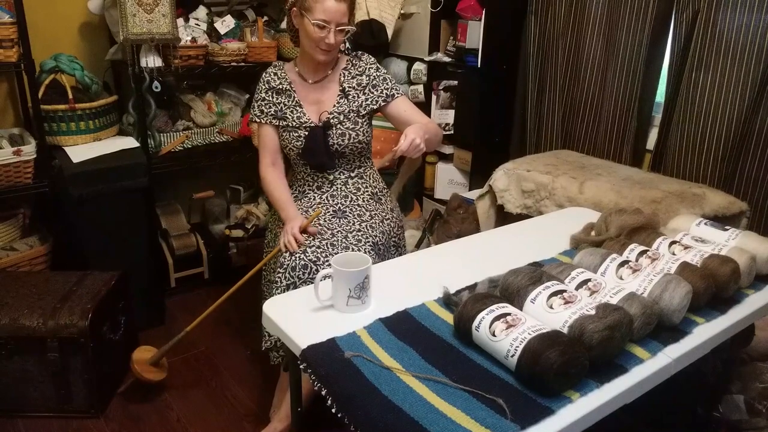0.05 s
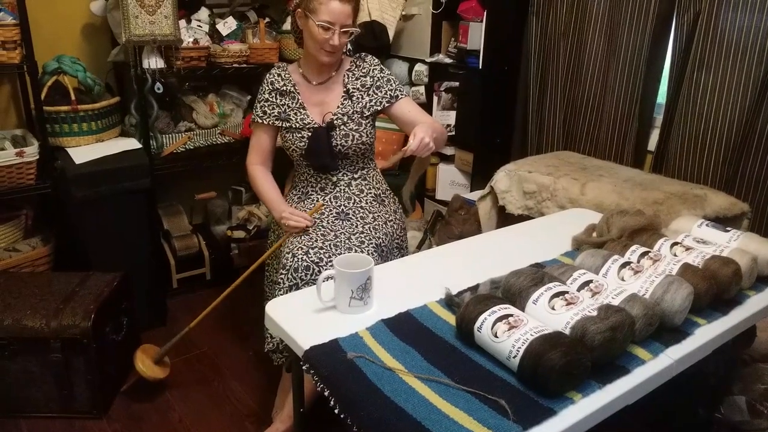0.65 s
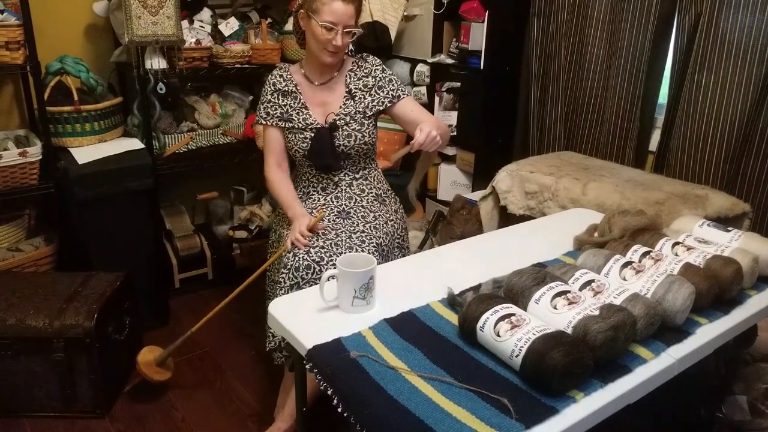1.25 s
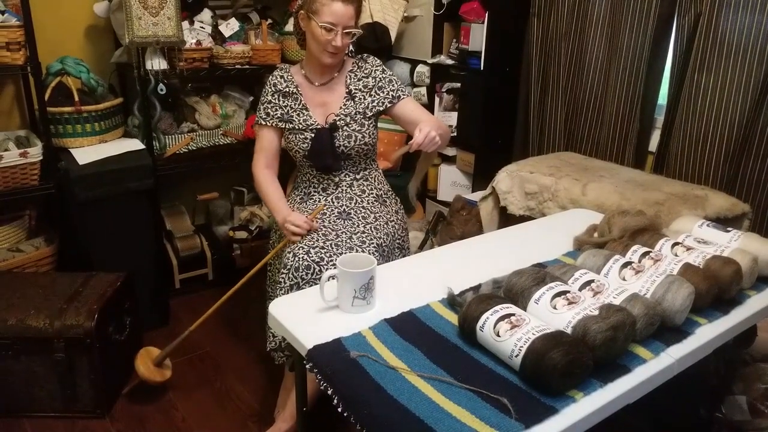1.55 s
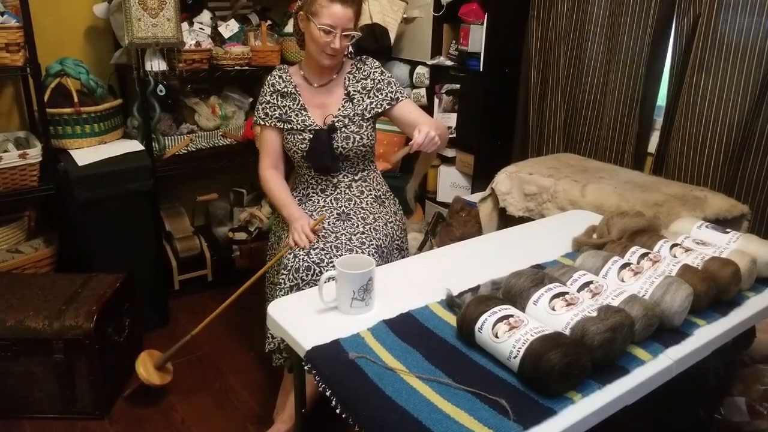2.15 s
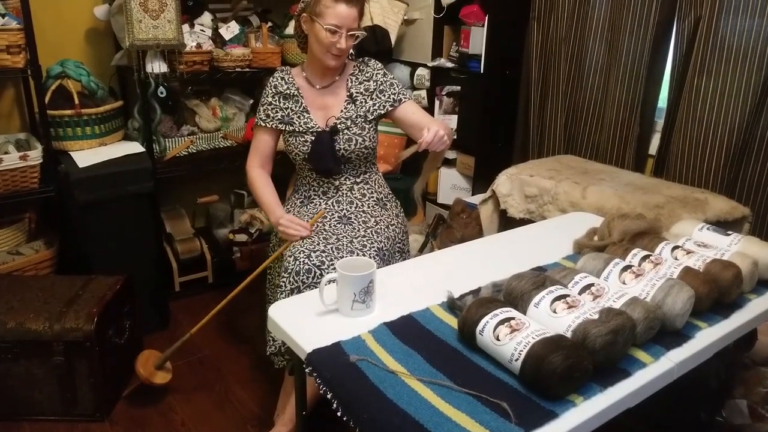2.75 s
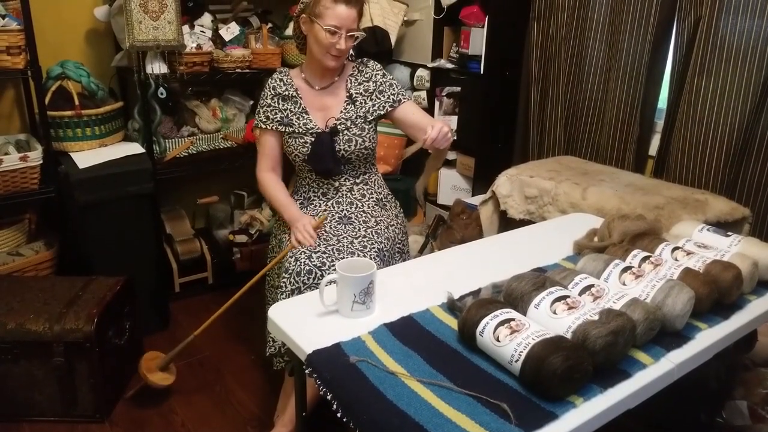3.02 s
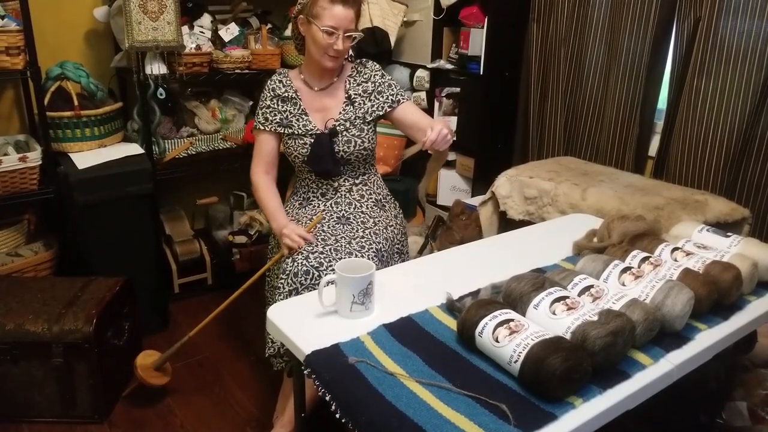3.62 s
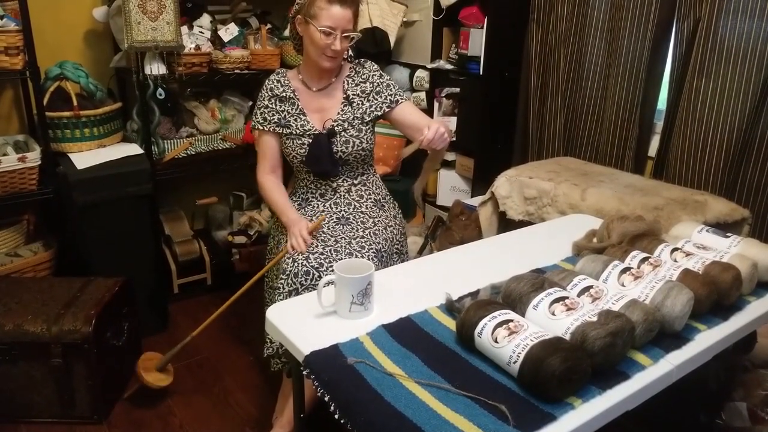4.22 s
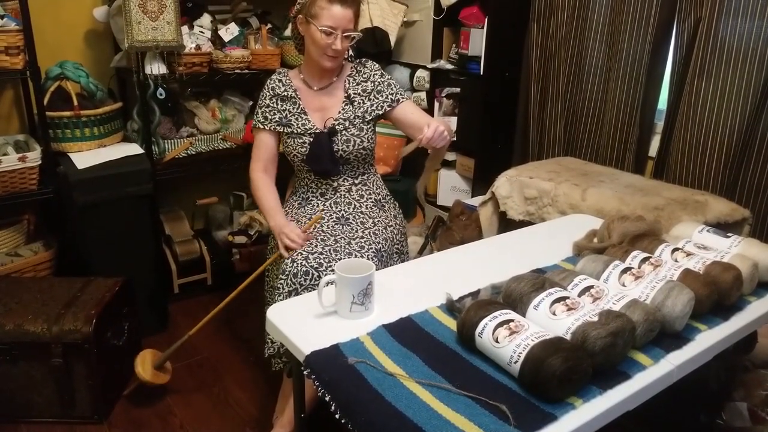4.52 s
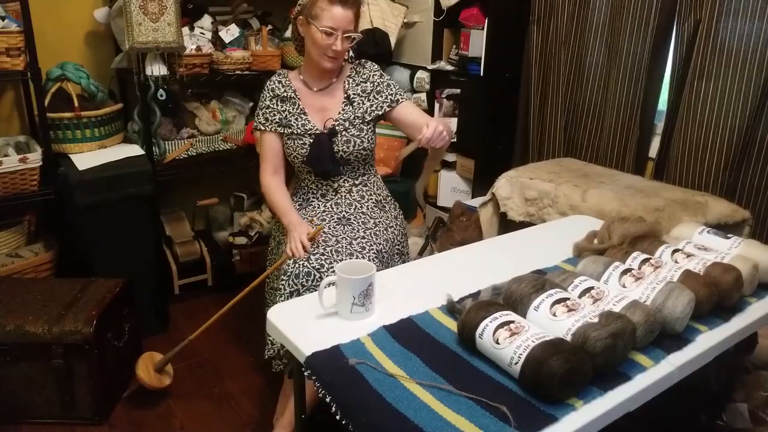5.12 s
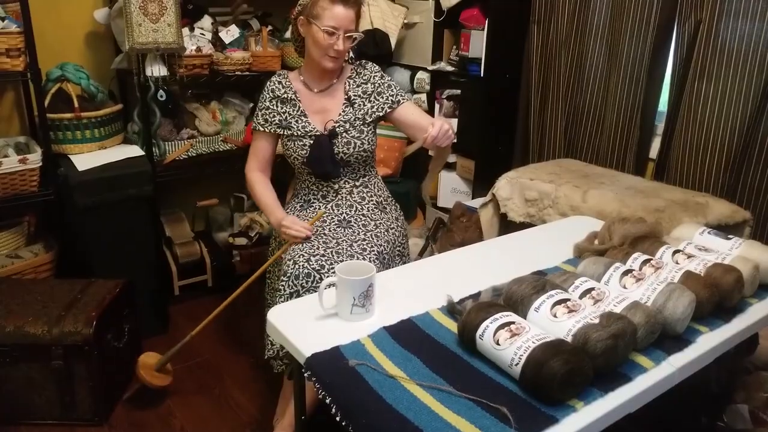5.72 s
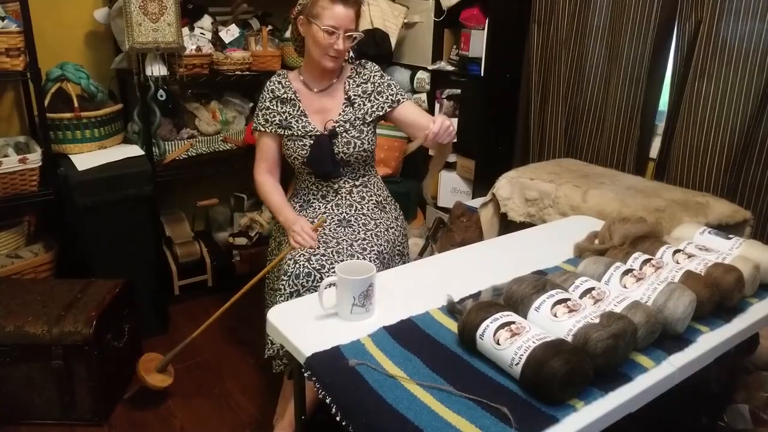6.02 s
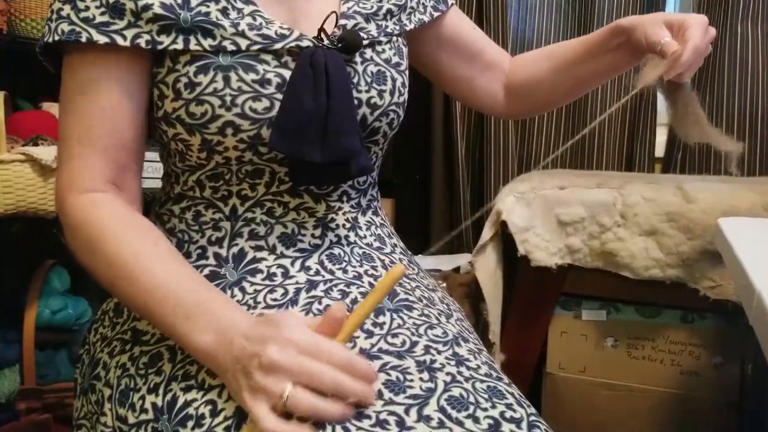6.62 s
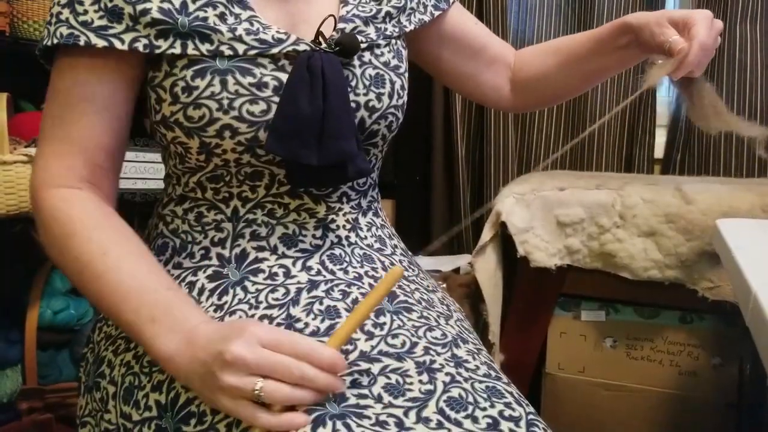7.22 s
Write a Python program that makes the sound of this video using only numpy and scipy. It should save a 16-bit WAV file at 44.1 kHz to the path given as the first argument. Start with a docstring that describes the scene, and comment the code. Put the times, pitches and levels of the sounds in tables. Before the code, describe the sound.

A wooden spindle is rolled on a lap in a small, quiet room, its tip resting on a hardwood floor. A finger ring strikes the shaft with light, sharp ticks close to the microphone, roughly every 0.4 seconds through the first three seconds, strongest near 0.2, 0.5, 1.8 and 2.6 seconds. Further ticks come less regularly, the clearest around 3.9, 4.3, 5.6 and 6.4 seconds. Between them the tip rolls faintly, hops and lands with small wooden knocks, each with a quick bounce and a short room echo. These knocks stand out at about 0.3, 0.7 and 1.9 seconds, then come more often from 2.8 seconds on, with firmer ones near 4.8, 6.2, 6.6 and 7.1 seconds. Very soft, dull bumps of hand on cloth are scattered underneath. A faint, steady hiss and low room rumble continue throughout.

```python
"""A spindle rolled on a wooden floor

A long wooden spindle is rolled on a lap, its tip resting on hardwood boards in a small, quiet room.
At each stroke a finger ring strikes the shaft and excites its short-lived modes; the tip then rolls,
hops and knocks, driving the boards by impact, while hand and cloth make dull bumps. A clip-on
microphone hears the ticks close by and the knocks through the room, over its own hiss."""
import sys
import numpy as np
from scipy import signal
from scipy.fft import rfft, irfft
from scipy.io import wavfile
from scipy.ndimage import uniform_filter1d

SR = 44100
rng = np.random.default_rng(int(sys.argv[2]) if len(sys.argv) > 2 else 0)


def master(y):
    """Save y as 16-bit WAV."""
    cut = np.clip(np.atleast_2d(y).T, -1, 1)
    pcm = np.round(cut * 32767)  # scale
    wavfile.write(sys.argv[1], SR, pcm.astype(np.int16))


N = 320166
T = np.arange(N) / SR

# Spectrum of room rumble and microphone hiss. Each row: frequency in Hz, relative level in dB.
BACKGROUND_SPECTRUM = [(22, -15), (40, -14), (70, 5), (110, 0.5), (200, -1), (330, 0), (600, -4.5),
                       (1200, -3), (2500, -9.5), (4300, -10.5), (5200, -4), (6800, -5.5)]
# Impacts of the finger ring on the shaft.
# Each row: start in seconds, level in dB, nominal pitch of the lowest mode in Hz, brightness in dB.
RING_TICKS = [(0.1621, -24.5, 1925, 7.5), (0.5359, -25, 1944, 9.5), (0.8859, -43, 1970, 7),
              (1.356, -30.5, 1950, 11.5), (1.7723, -25.5, 1940, 11), (2.1591, -32, 1970, 10.5),
              (2.6144, -26, 2020, 1), (3.04, -32.5, 2050, 1.5), (3.8618, -28, 1960, 4),
              (4.276, -30.5, 1936, -1), (4.7436, -33.5, 2400, -16), (5.6104, -28, 1866, 6),
              (6.0278, -33.5, 2310, -1), (6.4352, -30.5, 1950, 8.5), (6.9383, -33, 2020, -3)]
# Further modes of the shaft. Each row: frequency in Hz, relative level in dB, free T60 in seconds.
SHAFT_MODES = [(1150, -26, 0.025), (2863, -8.5, 0.007), (4200, -19.5, 0.0088), (4746, -17, 0.012),
               (5750, -19.5, 0.0085), (6100, -38, .008)]
# Room resonances excited by a tick. Each row: frequency in Hz, relative level in dB.
ROOM_MODES = [(1618, 7), (1840, -4), (1949, -5), (2326, 0), (2740, 1), (2895, -2), (4310, 1), (4675, 1)]
# Spells of rolling without a hop. Each row: centre in seconds, half-width in seconds, level in dB.
TIP_ROLLS = [(0.298, 0.029, -56.5), (1.017, 0.072, -61), (1.512, 0.12, -57), (1.87, 0.083, -61),
             (2.272, 0.13, -63), (3.064, 0.057, -60.5), (4.237, 0.043, -62.5), (4.67, 0.081, -60.5),
             (5.982, 0.037, -62), (6.26, 0.045, -60), (6.928, 0.064, -59.5), (7.074, 0.037, -52)]
# Landings of the tip, each with one bounce. Each row: start in seconds, level in dB, resonance of the
# spot in Hz, brightness in dB, bounce delay in seconds, its relative level in dB, its resonance in Hz.
TIP_KNOCKS = [(0.317, -28.5, 1030, -18, 0.019, -1.5, 990), (0.661, -31.5, 1170, -14.5, 0.013, -3.5, 1220),
              (1.585, -41, 845, -32, 0.0091, -8.5, 860), (1.945, -31, 990, -21, .021, 1, 1090),
              (2.808, -36, 1120, -20.5, .018, -10, 890), (3.271, -37.5, 1190, -25, 0.012, 1.5, 920),
              (3.577, -34.5, 1200, -9.5, 0.014, 5.5, 1150), (3.994, -31.5, 1250, -10, 0.015, 1, 1350),
              (4.419, -30.5, 1100, -11.5, .024, -4.5, 1270), (4.593, -34, 1190, -23, 0.043, -15.5, 870),
              (4.829, -28, 1270, -13.5, 0.029, -5, 1240), (5.082, -43, 1180, -21, .018, -14, 1150),
              (5.3, -32, 1300, -22.5, 0.014, -2, 1360), (5.82, -39.5, 1220, -30, 0.015, 0, 1280),
              (5.92, -38, 950, -32, 0.017, -25, 950), (6.162, -28.5, 1210, -16, 0.019, 0, 820),
              (6.331, -47, 930, -25, .018, -12, 1000), (6.593, -29.5, 1240, -15.5, 0.016, 2.5, 1210),
              (6.667, -36, 960, -18, 0.016, -18, 970), (7.076, -26.5, 1180, -17, .019, 3.5, 840)]
# Frequency response of the struck boards. Each row: frequency in Hz, gain in dB.
BOARD_RESPONSE = [(80, -36), (430, -15.5), (540, -13), (660, -5), (780, 2), (1200, 2.5), (1450, -8.5),
                  (1900, -20), (2800, -17.5), (3550, -17), (4000, -28), (4550, -37.5), (4950, -22.5),
                  (6800, -34.5)]
# Resonances of floor and room excited by the tip. Each row: frequency in Hz, relative level in dB.
FLOOR_MODES = [(615, -3), (651, -5), (698, 6.5), (782, -1), (865, -2), (1006, -1), (1046, -4), (1130, 1),
               (1240, 1), (1322, -4), (1408, -5), (1500, 0), (1618, 4), (2500, 2), (2820, 6), (3498, 3)]
# Early reflections from furniture and walls. Each row: delay in seconds, amplitude gain.
REFLECTIONS = [(.00778, .7), (.00896, .2), (.01134, .36), (.01277, .2), (.01603, .26), (.02193, .37),
               (.02571, .39), (.03082, .24), (.03458, .37)]
# Firmer bumps of hand and cloth. Each row: start in seconds, level in dB, pitch in Hz.
FIRM_BUMPS = [(1.619, -62, 110), (2.058, -66, 101), (2.15, -60.5, 89), (2.474, -64, 296), (2.945, -68, 147),
              (3.508, -63.5, 113), (4.602, -66, 120), (5.601, -62, 69.5), (6.146, -57, 86.5),
              (6.765, -61, 140)]


def undb(db):
    """Amplitude ratio of a level in decibels."""
    return 10 ** (np.asarray(db) / 20)


def unit(x):
    """Normalisation to an rms of one."""
    return x / np.sqrt(np.mean(x ** 2))


def add(out, start, x):
    """Superposition of x on out, from a start in seconds."""
    i = max(int(start * SR), 0)
    out[i:i + len(x)] += x[:len(out) - i]


def colour(points, size):
    """Gain in dB at each transform bin, interpolated in log frequency between (Hz, dB) points."""
    hz, db = np.transpose(points)
    return np.interp(np.log(np.fft.rfftfreq(size, 1 / SR) + 1), np.log(hz), db)


def noise(points):
    """White noise filtered to a spectrum of (Hz, dB) points, at unit rms."""
    return unit(irfft(rfft(rng.standard_normal(N)) * undb(colour(points, N)), N))


def band(x, lo_hz, hi_hz, order=2):
    """Butterworth band-pass filter."""
    return signal.sosfilt(signal.butter(order, [lo_hz, hi_hz], "band", fs=SR, output="sos"), x)


def impulse_response(db, size):
    """Minimum phase: the causal response of a body follows from its gain curve."""
    cepstrum = irfft(np.log(undb(db)))
    cepstrum[1:size // 2] *= 2
    cepstrum[size // 2 + 1:] = 0
    return irfft(np.exp(rfft(cepstrum)))


def reverberation(t60, onset_s, points):
    """A diffuse field builds up after the direct sound and decays exponentially."""
    t = T[:SR // 2]
    build_up = np.clip(t / onset_s - 1 / 2, 0, 1)
    spectrum = rfft(rng.standard_normal(len(t)) * undb(-60 * t / t60) * build_up)
    spectrum /= np.sqrt(uniform_filter1d(abs(spectrum) ** 2, size=70))  # equal energy in every band
    return irfft(spectrum * undb(colour(points, len(t))), len(t))


def resonances(modes, level_db, t60):
    """Free decay of sparse normal modes after an impulse."""
    t = T[:SR // 2]
    return undb(level_db - 60 * t / t60) * sum(undb(db) * np.cos(2 * np.pi * hz * t) for hz, db in modes)


def background():
    """Noise floor: steady broadband noise and a low rumble with slow, random amplitude modulation."""
    swell = np.interp(T, np.linspace(0, T[-1], num=60), rng.standard_normal(60))
    rumble = unit(band(rng.standard_normal(N), 38, 343, order=3))
    return undb(-59) * noise(BACKGROUND_SPECTRUM) + undb(-81.5 + 2 * swell) * rumble


def ring_ticks():
    """Impact of metal on wood: a broadband crack and the damped modes of the shaft excite the room."""
    out, t = np.zeros(N), T[:SR // 16]
    free_hz, free_t60 = 1988, 0.013  # lowest mode of the freely rolling shaft
    room_colour = [(1000, 6.5), (1600, 3), (1950, -4), (2400, 5.5), (2800, 1),
                   (3500, -0.5), (4300, 2.5), (4750, -1), (5300, 1.5), (6500, 1.5)]
    for start, level_db, pitch_hz, bright_db in RING_TICKS:
        decay_scale = (free_hz / pitch_hz) ** 6.2  # a grip that raises the pitch shortens the decay
        modes = [(pitch_hz * 0.9815, 1, free_t60)]
        for hz, db, t60 in SHAFT_MODES:
            # The point of impact sets how strongly the upper modes speak.
            lift_db = np.interp(hz, [1900, 2900, 4300], [0, 0.93 * bright_db, bright_db])
            modes.append((hz * (1 + 0.006 * rng.standard_normal()), db + lift_db, t60))
        shaft = sum((-1) ** k * undb(db - 60 * t / (t60 * decay_scale)) * np.sin(2 * np.pi * hz * t)
                    for k, (hz, db, t60) in enumerate(modes))
        shaft *= 1 - np.exp(-t / 0.0005)
        crack = band(rng.standard_normal(len(t)), 1200, 7000)
        crack *= undb(-10.5 + bright_db / 2 - 60 * t / 0.01)
        gain = undb(level_db + 11.5) / np.linalg.norm(shaft + crack)
        room = reverberation(t60=0.3, onset_s=0.006, points=room_colour)
        room += resonances(ROOM_MODES, level_db=-52.5, t60=0.25)
        add(out, start, gain * (shaft + crack))
        add(out, start, gain * signal.fftconvolve(undb(-2) * shaft + undb(2.5) * crack, room))
    return out


def floor_to_microphone():
    """Impulse response of the room: early reflections, faint normal modes and a diffuse tail."""
    room_colour = [(450, 5.5), (750, 4), (1300, 0), (2800, 6.5), (6000, 3)]
    room = reverberation(t60=0.28, onset_s=0.0044, points=room_colour)
    room += resonances(FLOOR_MODES, level_db=-55.5, t60=0.31)
    for delay, gain in REFLECTIONS:
        room[int(delay * SR)] += gain
    return room


def tip_rolling():
    """Roughness excitation: the tip trips over the wood grain, driving the boards with tiny impulses."""
    impulses_per_s = 2500
    settling = [(start + 0.048, 0.075, db - 32.5) for start, db, *_ in TIP_KNOCKS]  # a roll at each knock
    envelope = sum(undb(db) * np.exp(-((T - centre) / width) ** 2)
                   for centre, width, db in TIP_ROLLS + settling)
    grain = rng.choice([-1, 1], N) * (rng.random(N) < impulses_per_s / SR)
    boards = band(grain, 865, 1075)
    reflected = signal.fftconvolve(boards, floor_to_microphone())[:N]
    return envelope * unit(boards + undb(-6.5) * reflected)


def tip_knocks():
    """Impact on a plate: each landing and bounce rings its own spot of board; harder ones are brighter."""
    size, usual_bright_db = 2048, -21.5
    out, t, bin_hz = np.zeros(N), T[:size], np.fft.rfftfreq(size, 1 / SR)
    treble_share = colour([(1100, 0.19), (2800, 0.84)], size)
    blows = []
    for start, db, spot_hz, bright_db, delay, bounce_db, bounce_hz in TIP_KNOCKS:
        blows.append((start, db, spot_hz, bright_db))
        blows.append((start + delay, db + bounce_db, bounce_hz, bright_db))
    for start, db, spot_hz, bright_db in blows:
        spot_db = 5 / (1 + ((bin_hz - spot_hz) / 160) ** 2)
        tilt_db = treble_share * (bright_db - usual_bright_db)
        board = impulse_response(colour(BOARD_RESPONSE, size) + spot_db + tilt_db, size)
        # The contact force is one impulse within a 4 ms skid.
        force = 0.05 * rng.standard_normal(size) * np.sin(np.pi * np.minimum(t / 0.004, 1))
        force[int(0.001 * SR)] += 1
        blow = signal.fftconvolve(board, force)
        blow *= undb(db + 15.5) / np.linalg.norm(blow)
        add(out, start, band(blow, 40, 2100, order=1))  # a table in the way dulls the direct sound
        # The tip wanders, so the room answers each blow a little differently.
        add(out, start, signal.fftconvolve(blow, floor_to_microphone()))
    return out


def lap_bumps():
    """Soft impact and friction: the hand on the lap gives a heavily damped thud and a rub of cloth."""
    out, t = np.zeros(N), T[:SR // 5]
    light_per_s = 3.8
    light_bumps = [(when * T[-1], -70 + 6 * (force - 0.5), 99 * 2 ** (pitch - 0.5))
                   for when, force, pitch in rng.random((int(light_per_s * T[-1]), 3))]
    for start, db, hz in FIRM_BUMPS + light_bumps:
        push = np.sin(2 * np.pi * hz * t) * (1 - np.exp(-t / 0.006)) * undb(-60 * t / 0.06)
        rub = unit(band(rng.standard_normal(len(t)), hz / 1.5, hz * 2.5, order=3)) * undb(-60 * t / 0.2)
        add(out, start, undb(db) * (undb(11) * push + undb(2) * rub))
    return out


def faint_tone():
    """A faint, low pure tone lingers through the last stroke."""
    fade_in = np.clip((T - 6.73) / 0.022, 0, 1)
    return undb(-71.5) * np.sin(2 * np.pi * 253 * T) * fade_in


def scene():
    """Superposition of spindle, hand and room at the microphone, in one channel."""
    return (background() + ring_ticks() + tip_rolling() + tip_knocks() + lap_bumps() + faint_tone())[None]


def record(dry):
    """Band limiting: the microphone passes 38 Hz to 7 kHz; the electronics add hiss and cut the top."""
    narrow = signal.sosfilt(signal.cheby1(12, 0.2, 6950, fs=SR, output="sos"), dry)
    narrow = signal.sosfilt(signal.butter(3, 38, "high", fs=SR, output="sos"), narrow)
    hiss = undb(-75) * noise([(3000, 4), (8000, 3.6), (15000, 1)])
    return signal.sosfilt(signal.ellip(10, 0.2, 70, 15650, fs=SR, output="sos"), narrow + hiss)


dry = scene()
out = record(dry)
master(out)
```